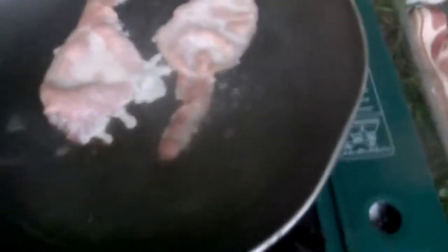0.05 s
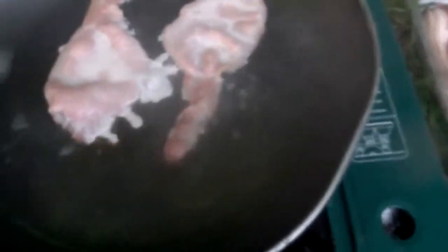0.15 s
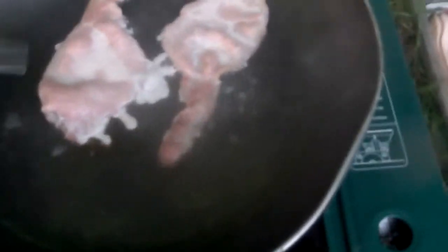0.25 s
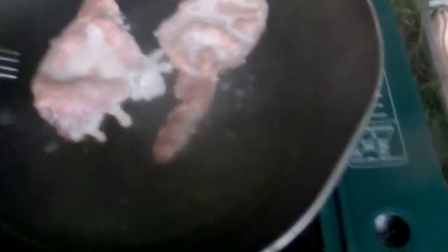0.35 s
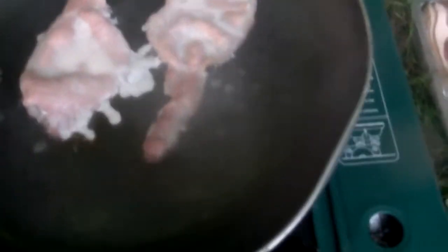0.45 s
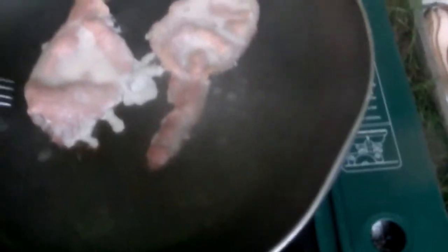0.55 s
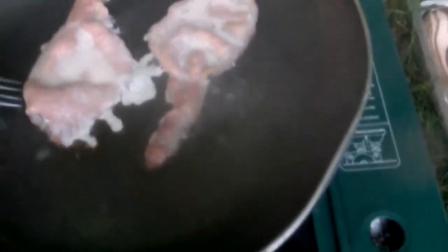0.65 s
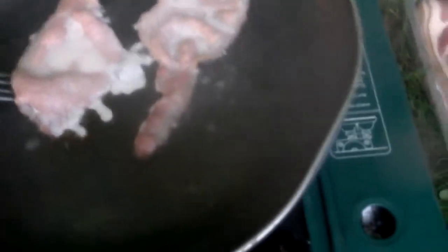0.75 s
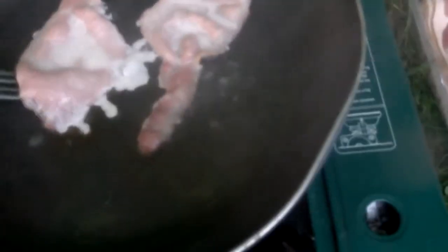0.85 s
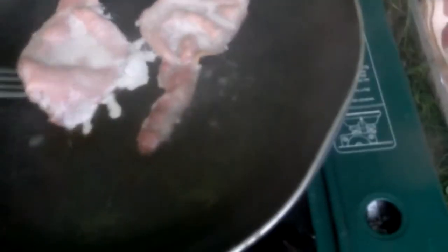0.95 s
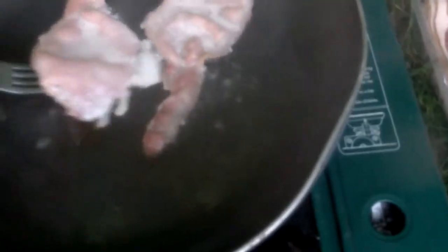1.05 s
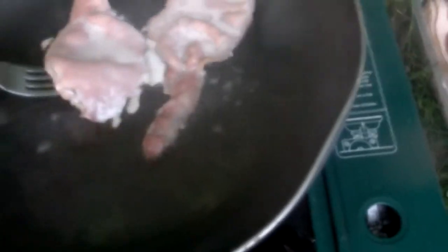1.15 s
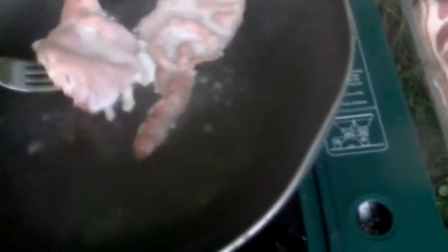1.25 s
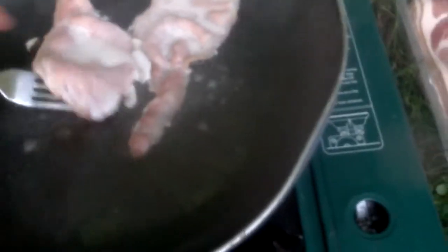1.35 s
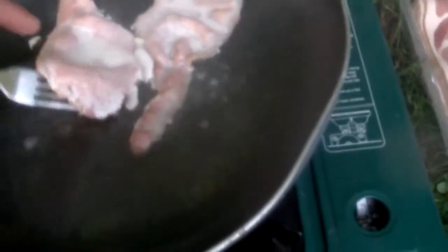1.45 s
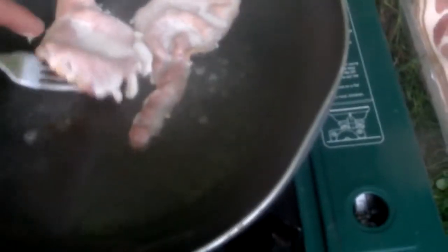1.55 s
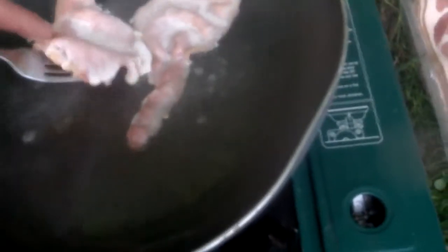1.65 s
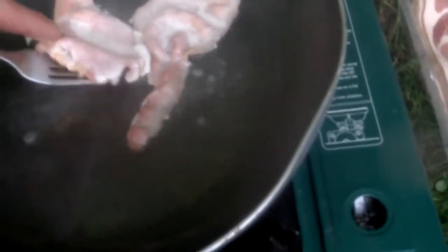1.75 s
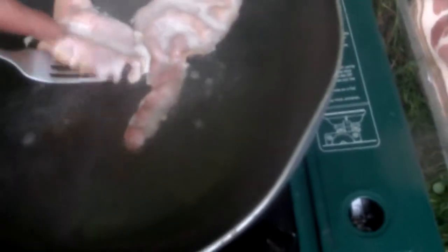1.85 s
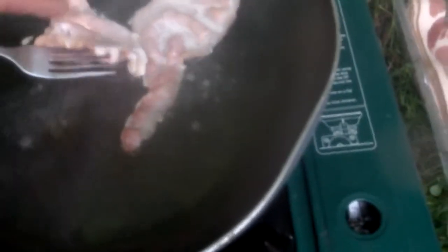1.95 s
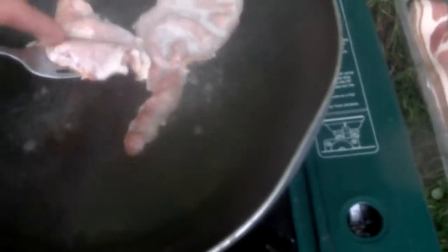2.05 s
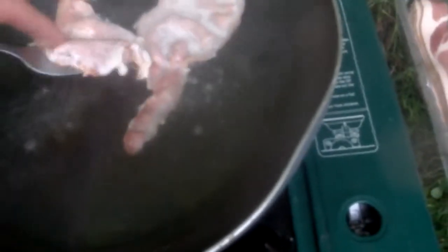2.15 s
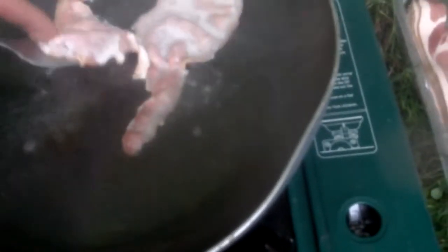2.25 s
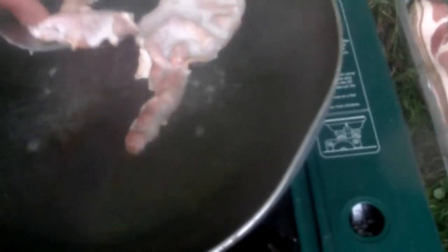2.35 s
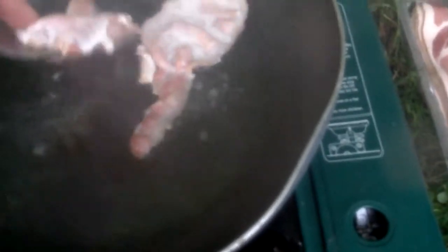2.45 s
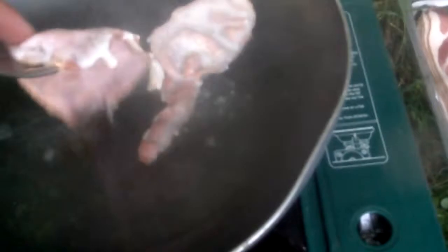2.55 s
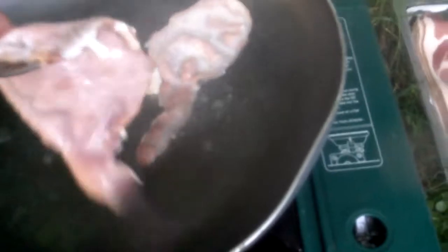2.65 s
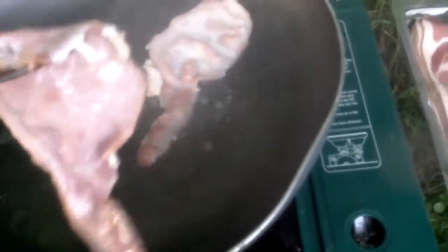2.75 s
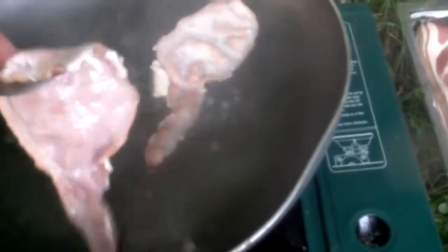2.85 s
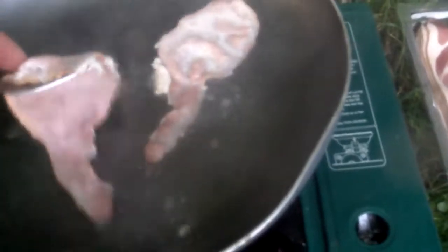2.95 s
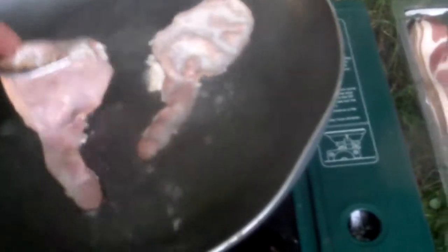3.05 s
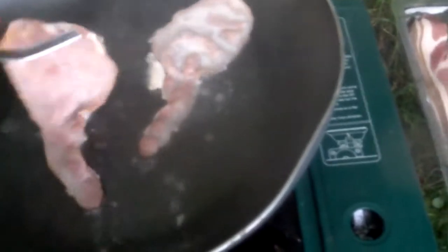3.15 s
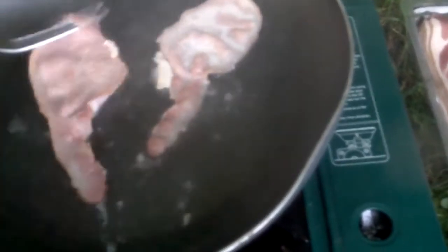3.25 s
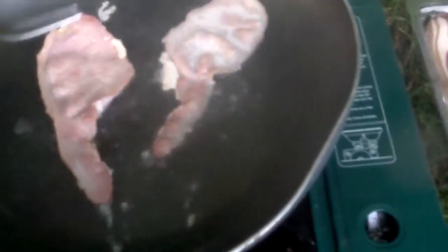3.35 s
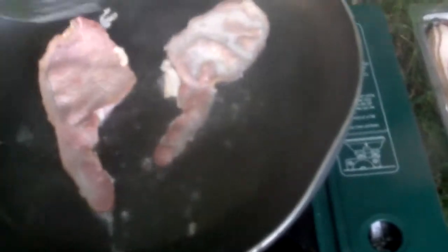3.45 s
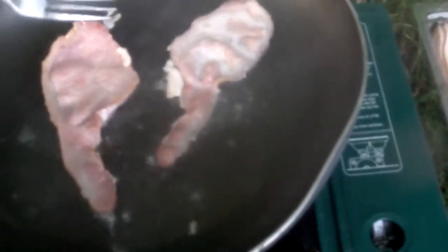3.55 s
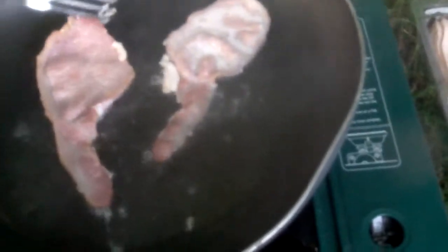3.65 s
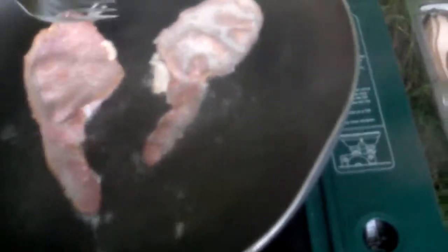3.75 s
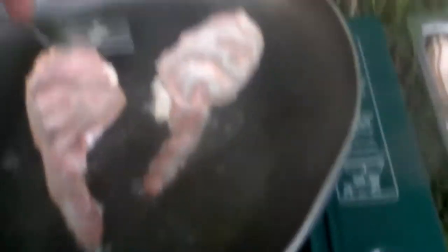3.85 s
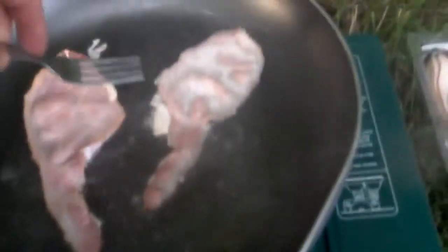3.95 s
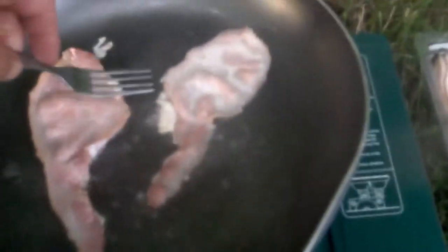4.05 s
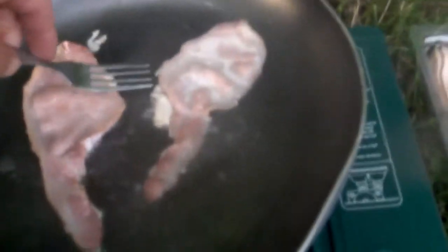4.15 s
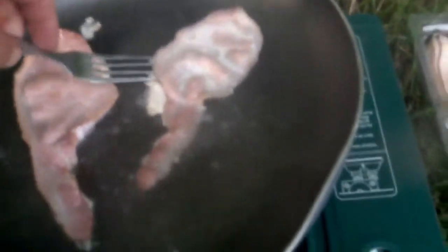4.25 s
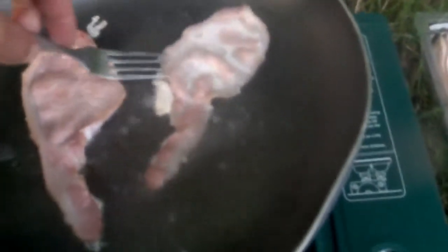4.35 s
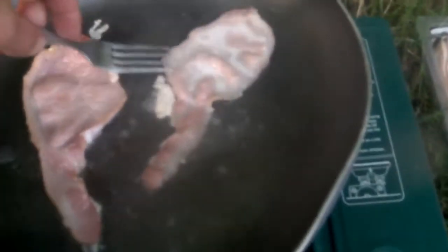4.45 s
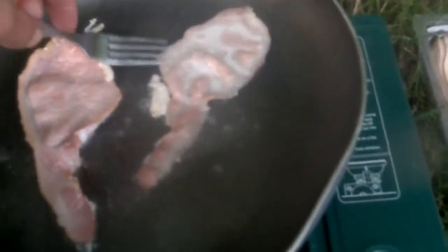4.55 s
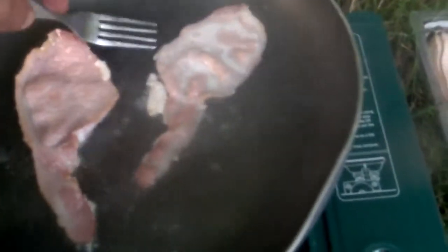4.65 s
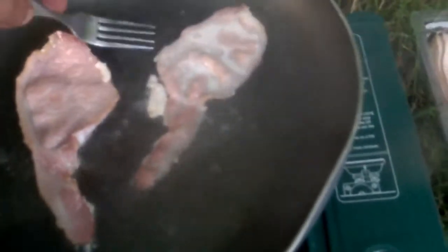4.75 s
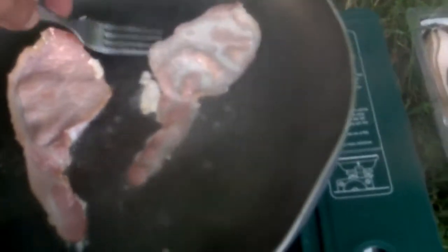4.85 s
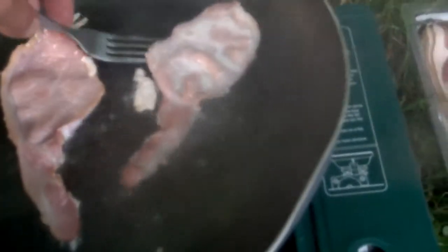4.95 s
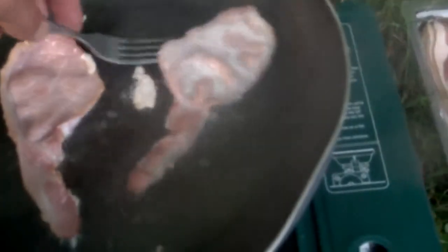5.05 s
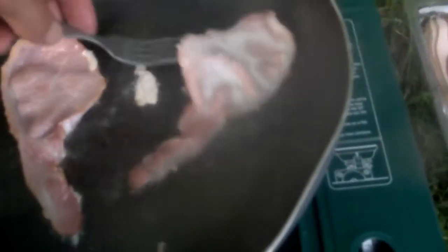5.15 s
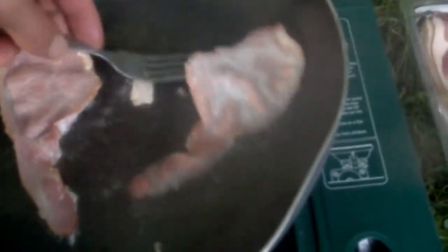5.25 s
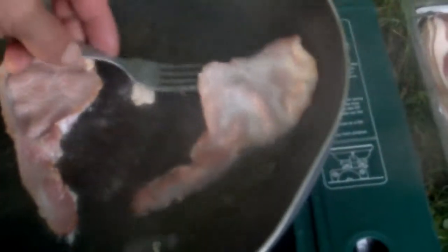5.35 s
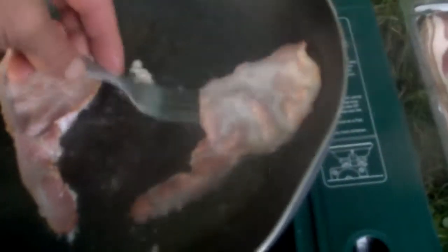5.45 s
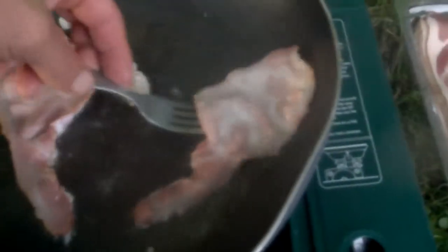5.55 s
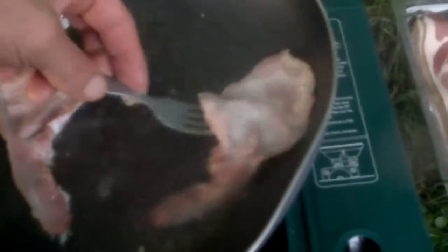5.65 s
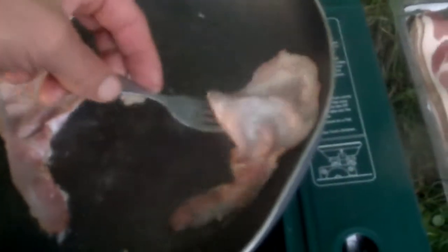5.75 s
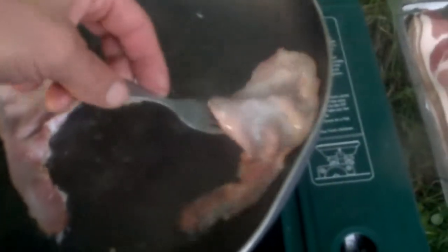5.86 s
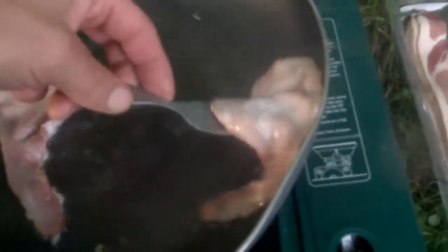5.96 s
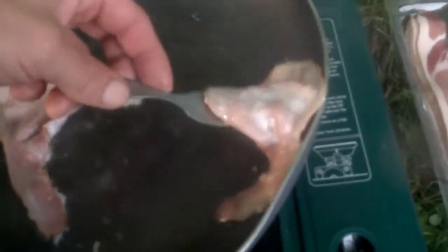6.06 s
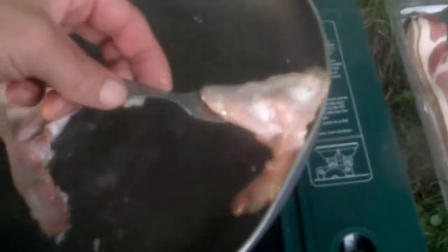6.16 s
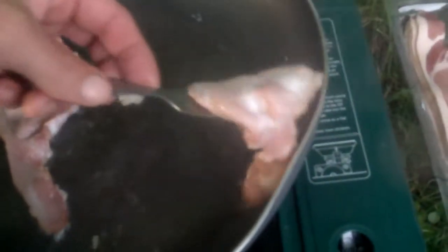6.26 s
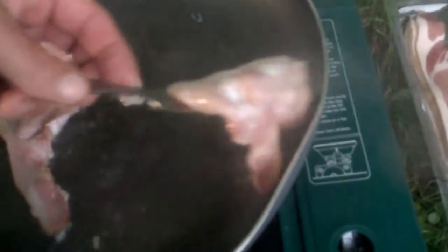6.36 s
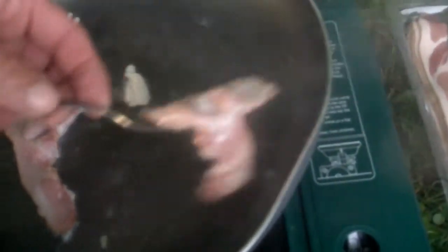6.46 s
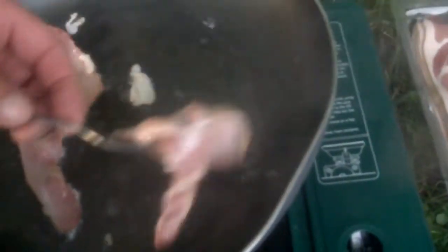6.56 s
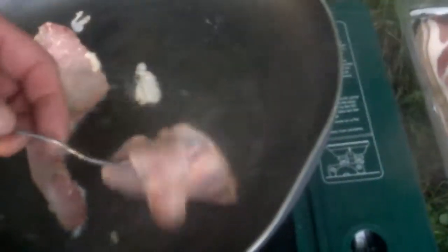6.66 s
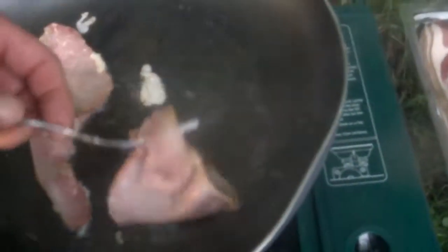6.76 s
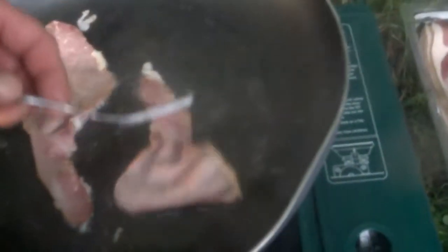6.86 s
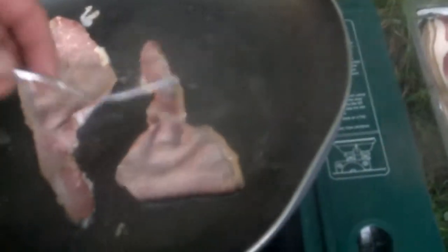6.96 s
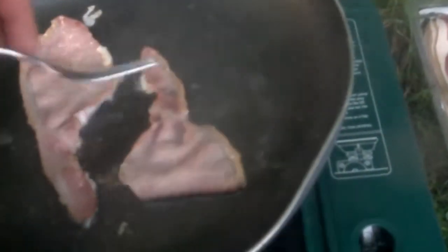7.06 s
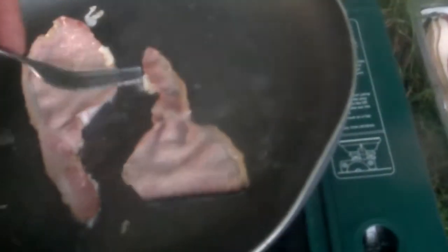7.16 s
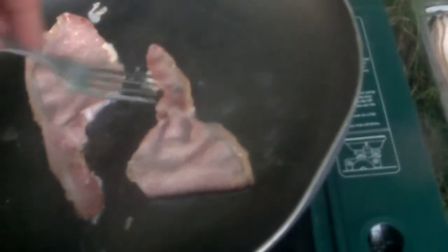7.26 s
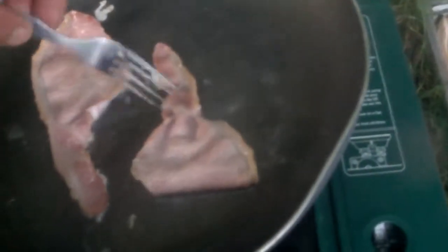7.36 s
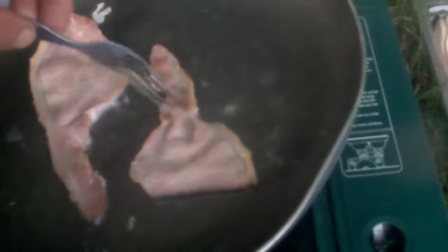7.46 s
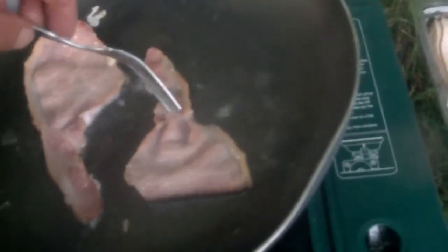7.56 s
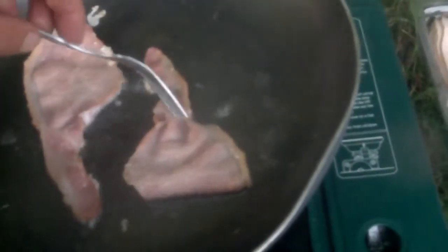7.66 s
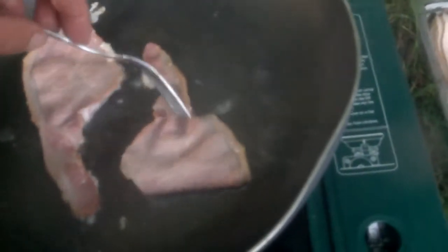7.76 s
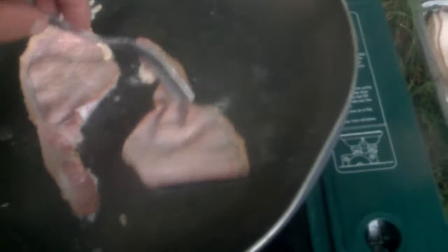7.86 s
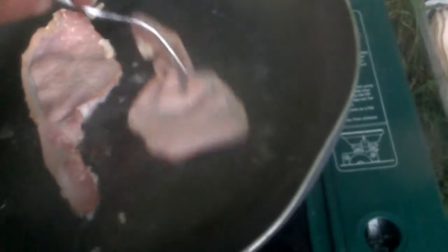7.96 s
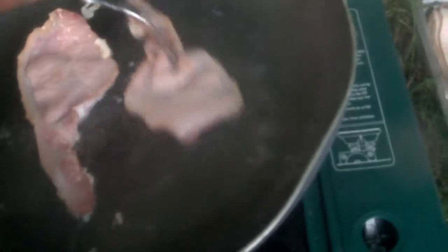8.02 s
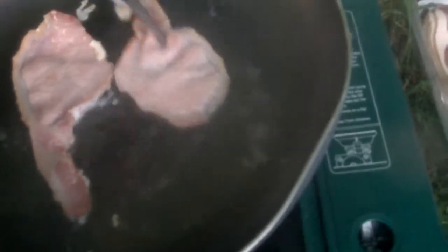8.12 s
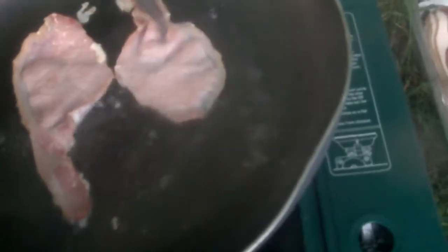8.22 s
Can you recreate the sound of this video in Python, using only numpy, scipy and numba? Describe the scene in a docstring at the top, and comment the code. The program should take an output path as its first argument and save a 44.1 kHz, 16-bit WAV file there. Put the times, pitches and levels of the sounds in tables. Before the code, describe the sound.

A low burner roar lies beneath bright, uneven bacon sizzle. Quiet simmering and scattered ticks come first; after a turned slice touches down, the frying swells into dense crackling with bubbly pops. Light dull knocks ring the pan briefly. A second slice slaps down with a short rumble, then is dragged while sizzling continues. Close, dry, practically mono outdoor sound.

```python
"""Bacon frying outdoors

Bacon fries in a steel pan on a gas camping stove, close under a small microphone that feeds both channels.
Water boils out of the meat in bursts: steam bubbles ring briefly, fat spits in sharp clicks, the pan colours both.
The sizzle jumps when the first slice lands on its raw side. Knocks and small blows ring the pan floor.
The flame is low filtered noise that roars steadily underneath.
A trace of noise, of opposite sign in the two channels, follows the level of the spitting."""
import sys
import numpy as np
from scipy import signal
from scipy.fft import rfft, irfft
from scipy.io import wavfile
from scipy.ndimage import uniform_filter1d
from numba import njit

SR = 44100
rng = np.random.default_rng(int(sys.argv[2]) if len(sys.argv) > 2 else 0)


def dump(signal):
    """Clip the signal to [-1, 1] and save it as 16-bit WAV at the path in sys.argv[1]."""
    limited = np.clip(np.atleast_2d(signal).T, -1, 1)
    pcm = np.round(limited * 32767).astype(np.int16)
    wavfile.write(sys.argv[1], SR, pcm)


def attenuation_scalar(level_db):
    """Turn a level in dB into a linear amplitude multiplier (20 dB per decade)."""
    decades = np.asarray(level_db, float) / 20
    return 10 ** decades


N = 365588  # length in samples


# how pan and microphone colour the sizzle: frequency_hz, gain_db
PAN_COLOUR = [(350, -59), (600, -9.5), (844, -24), (941, -13), (1270, -9), (1580, -32), (2380, -26.5),
              (3210, -18.5), (3680, -8.5), (4450, -6), (5100, -8), (6520, -2), (8220, -10.5),
              (12200, -19.5), (15600, -30.5)]
# narrow resonances and dips of the air between pan wall and microphone: frequency_hz, width_hz, gain_db
PAN_PEAKS = [(2700, 102, 4), (4950, 120, -2.5), (6320, 90, 2.5), (6900, 70, 2.5), (8400, 150, -2.5),
             (9030, 120, 2.5)]
# the resonances shift as the meat covers other parts of the pan: frequency_hz, width_hz, gain_db
DRY_PEAKS = [(7180, 94, 5.5), (9180, 700, -4.5)]  # added before the first slice lands
LATE_PEAKS = [(1760, 150, -4), (2760, 430, 3)]  # added after the second slice flops over


def sizzle(surge_db):
    """Superposition of many random grains: four sizes of bubble and scattered spits, filtered by the pan."""
    t = np.arange(N) / SR
    dry, late = t < LANDING_S, t > FLOP_S
    fits = np.where(dry, 0.7, 1)  # the fits are milder in dB until the wet side lands

    def burst():
        """Modulated event rate: steady simmering plus fits partly in step with the common surge."""
        own_db = 3.2 * walk(4.) + 2.6 * walk(45.) + 2.5 * walk(100.)
        return 1 + attenuation_scalar(fits * (1.2 * surge_db + own_db))

    large = bubbles(burst(), 1700., 3200., 12., 3.2, count=12000)
    middle = bubbles(burst(), 3200., 5400., 22., 3.6, count=20000)
    # small bubbles ring higher until the wet side lands
    small = bubbles(burst(), 5200., 8200., 22., 3.7, count=26000, dry_pitch=1.14)
    tiny = bubbles(burst() ** .5, 8200., 16000., 20., 2.2, count=45000)
    crackle = level(snap(snap(snap(droplets(burst(), 7.0, count=600)))), -3.5)
    ticks = level(droplets(burst(), 4.3, count=2200), -.7)
    # the pan colour is weak below and above its broad hump, so those layers start stronger
    body = stage_gain(3) * (middle + ticks) + boil_gain() * attenuation_scalar(-1.0) * small
    bass = attenuation_scalar(21.5) * stage_gain(2) * large
    treble = attenuation_scalar(16.5) * stage_gain(1) * (crackle + tiny)
    simmer = lulls() * (body + bass + treble)
    spans = ((dry, DRY_PEAKS), (~dry & ~late, []), (late, LATE_PEAKS))
    return sum(colour(span * simmer, PAN_COLOUR, PAN_PEAKS + shifted) for span, shifted in spans)


def bubbles(burst, low_hz, high_hz, cycles, spread_db, count, dry_pitch=1):
    """Free oscillation of steam bubbles: a random size sets the loudness, and decay time follows the period."""
    start, size = swarm(burst, count, spread_db, 16)
    draw = rng.random((count, 2))
    hz = low_hz + (high_hz - low_hz) * draw[:, 0]
    hz = hz * np.where(start < LANDING_S * SR, dry_pitch, 1)
    t60 = cycles * (.5 + draw[:, 1]) / hz
    return level(ring(start, hz, t60, size / np.sqrt(t60), .08, .11, N), 0)


def droplets(burst, spread_db, count):
    """Impulsive excitation: each bursting droplet of fat is a single click of either sign."""
    start, size = swarm(burst, count, spread_db, 18)
    return np.bincount(start, size * rng.choice([-1, 1], count), N)[:N]


def snap(clicks):
    """Differentiation tilts the spectrum: a bursting film of fat is brighter than a plain click."""
    return signal.lfilter([1, -.85], [1], clicks)


# how hard the water boils out of the meat, joined by straight lines: time_s, level_db (relative)
BOIL = [(0.0, -28.5), (0.7, -28.5), (1.0, -26), (1.55, -25.5), (2.1, -25), (2.75, -25.5), (2.965, -22),
        (2.995, -21.5), (3.3, -19.5), (3.9, -21.5), (4.02, -18), (4.15, -20.5), (5.0, -18), (5.6, -21),
        (6.0, -19), (6.4, -21), (7.05, -19.5), (8.29, -20)]


def boil_gain():
    """Amplitude envelope of the boiling, sample by sample."""
    return attenuation_scalar(np.interp(np.arange(N) / SR, *np.transpose(BOIL)))


# each handling of the meat shifts the mix; levels are relative to the boil:
# start_s, spitting_db, large_bubbles_db, middle_bubbles_db
# in turn: both slices lie still; the fork lifts the first slice and bare fat spits; it hangs in the air;
# it lands on its wet side; juice pools under it; the juice has spread; the second flops over; it is dragged aside
STAGES = [(0.0, -10, -22.5, -3), (1.1, -9, -24.5, -4.5), (2.45, -11, -27, -5.5), (2.97, -11, -24, -1),
          (3.42, -12.5, -23, 0.5), (4.1, -12, -24, -2), (6.75, -13.5, -21.5, -2), (8.0, -13.5, -26, -2)]
LANDING_S, FLOP_S = STAGES[3][0], STAGES[6][0]


def stage_gain(column):
    """Spectral balance by stage: gain of the spitting (1), large (2) or middle bubbles (3) over the boil."""
    rows = np.array(STAGES)
    held_db = rows[np.searchsorted(rows[1:, 0], np.arange(N) / SR), column]
    return boil_gain() * attenuation_scalar(uniform_filter1d(held_db, int(0.063 * SR)))  # the mix takes 63 ms to change


# each burst, spit and snap sounds this long after its listed time
ONSET_DELAY_S = 0.001
# loudest bubble bursts: start_s (1 ms before the sound), level_db (relative), pitch_hz (at the onset)
POPS = [(0.595, -18, 4860), (0.7494, -15, 7050), (0.9882, -13, 7220), (1.3014, -14, 6190),
        (1.4094, -18, 4600), (1.5564, -13, 6220), (1.6013, -14, 6950), (1.6796, -13, 7220),
        (1.8654, -16, 4400), (2.0153, -15, 7000), (2.4319, -18, 4260), (2.4678, -16, 6770),
        (2.5212, -14, 7330), (2.6758, -18, 3900), (2.9926, -8, 6350), (3.044, -9, 5740), (3.1807, -5, 6020),
        (3.3273, -9, 4290), (3.6102, -6, 6340), (4.0198, -3, 4590), (4.0846, -7, 6810), (4.2043, -6, 6010),
        (4.5855, -11, 6320), (4.6214, -5, 6760), (4.6553, -4, 6890), (4.7237, -4, 6730),
        (5.3009, -11, 6680), (5.4296, -8, 6490), (5.5134, -8, 4500), (5.5643, -7, 6360), (5.8815, -9, 4490),
        (6.0152, -3, 4950), (6.0526, -6, 6290), (6.3794, -8, 6940), (6.5274, -5, 7070), (6.5755, -7, 6840),
        (6.6528, -5, 5810), (6.8613, -4, 5160), (6.9536, -6, 4410), (6.99, -7, 4190), (7.0504, -7, 5580),
        (7.1038, -6, 6110), (7.4114, -8, 4270), (7.5692, -9, 4350), (7.7994, -7, 6460), (8.0875, -8, 6040)]
# loudest sharp spits: start_s (1 ms before the sound), level_db (of the treble, relative)
SPITS = [(0.0847, -20), (0.1999, -19), (0.818, -20), (1.1029, -20), (2.0457, -19), (2.152, -14),
         (2.3481, -20), (2.9397, -15), (3.2176, -14), (3.3473, -13), (3.3554, -10), (3.6262, -15),
         (3.7494, -18), (3.9823, -14), (3.9954, -14), (4.0886, -15), (4.2961, -15), (4.3254, -15),
         (4.366, -16), (4.3894, -13), (4.7461, -18), (4.8274, -16), (5.225, -14), (5.6361, -13),
         (5.8775, -16), (6.0317, -17), (6.0405, -15), (6.1514, -19), (6.3864, -13), (6.6792, -18),
         (7.1696, -13), (7.5398, -17), (7.7468, -16), (8.2357, -17)]


def loud_pops():
    """Transient radiation: bursts ring as bubbles amid a spray of droplets, and lone spits click sharply."""
    s, db, hz = np.transpose(POPS)
    cycles, swell = 26., .05  # cycles to fall 60 dB; share of the life spent swelling
    u = np.linspace(0, 1, 500)
    shape = (1 - np.exp(-u / swell)) ** 2 * 1000. ** -u
    start = ((s + ONSET_DELAY_S) * SR).astype(int)
    pops = ring(start, hz, cycles / hz, .88 * attenuation_scalar(db) / shape.max(), 0.033, swell, N)

    # the spray is noise that rises and fades around each burst
    fade = np.exp(-np.abs(np.arange(-600, 600)) / (0.0032 * SR))
    swells = np.convolve(np.bincount(start, attenuation_scalar(db), N), fade, "same")
    spray = colour(attenuation_scalar(-2.5) * swells * rng.standard_normal(N), PAN_COLOUR, PAN_PEAKS)

    s, db = np.transpose(SPITS)
    spit = colour(snap(snap(snap(np.arange(2048) == 0))), PAN_COLOUR, PAN_PEAKS)[:2048]
    highpass = signal.butter(4, 9500, "highpass", fs=SR, output="sos")
    treble = signal.sosfilt(highpass, spit)
    clicks = np.bincount(((s + ONSET_DELAY_S) * SR).astype(int), attenuation_scalar(db + 4.5), N)
    lone_spits = signal.fftconvolve(clicks, spit / np.abs(treble).max())[:N]
    return pops + spray + lone_spits


def lulls():
    """Gating before release: the simmer dips by 2.5 dB while steam gathers for each loud burst."""
    start = (np.transpose(POPS)[0] * SR).astype(int)
    half = int(0.006 * SR)  # half the length of a dip
    dip = np.convolve(np.bincount(start, minlength=N), np.hanning(2 * half))[2 * half:]
    return attenuation_scalar(-2.5 * np.pad(dip, (0, N))[:N])


# dry snaps of large pockets of fat that reach down into the mids:
# start_s (1 ms before the sound), level_db (peak of the mids)
SNAPS = [(1.7464, -28), (2.5696, -27), (3.488, -26), (3.5693, -26), (4.0881, -24), (4.347, -27),
         (4.3894, -25), (6.0462, -24), (6.7002, -27), (6.9341, -26), (7.0384, -25), (7.1731, -25),
         (7.5692, -25), (7.6101, -24), (7.6999, -24)]


def snaps():
    """Band-limited impulsive noise: short cracks that fall 60 dB in 6 ms."""
    s, db = np.transpose(SNAPS)
    fade = 1000. ** (-np.arange(512) / SR / 0.006)
    band = signal.butter(1, (1200, 4800), "bandpass", fs=SR, output="sos")
    cracks = signal.sosfilt(band, rng.standard_normal((len(s), 512)) * fade)
    mids = signal.butter(2, [1500, 3300], "bandpass", fs=SR, output="sos")
    out = np.zeros(N + 512)
    for start, gain, crack in zip(((s + ONSET_DELAY_S) * SR).astype(int), attenuation_scalar(db), cracks):
        out[start:start + len(crack)] += gain * crack / np.abs(signal.sosfilt(mids, crack)).max()
    return out[:N]


# dull knocks that ring the pan floor: start_s, level_db (relative)
KNOCKS = [(0.517, -22.5), (2.948, -26), (4.45, -23), (5.156, -23), (5.565, -21.5), (6.234, -22),
          (6.387, -26), (6.855, -28), (7.575, -26.5), (7.701, -23)]
# pan floor modes: frequency_hz, level_db (relative), t60_s
PAN_MODES = [(872, 0.5, 0.015), (1046, -3.5, 0.022), (1289, 2.5, 0.025)]


def pan_floor(surge_db):
    """Modal response: knocks and a patter that grows with the boiling ring the low modes; the patter also ticks."""
    s, db = np.transpose(KNOCKS)
    blows = np.bincount((s * SR).astype(int), attenuation_scalar(db), N)
    crowding = 1 + attenuation_scalar(3.0 * surge_db + 2.5 * walk(50.))
    patter = level(droplets(crowding, 7.0, count=4500), -51.5)
    patter = patter * (boil_gain() / attenuation_scalar(-14.5)) ** 1.48
    t = np.arange(SR // 8) / SR
    modes = sum(attenuation_scalar(g) * np.sin(2 * np.pi * f * t) * 1000. ** (-t / t60) for f, g, t60 in PAN_MODES)
    # wet meat lands softly, so the modes take a moment to build
    rung = signal.fftconvolve(blows + patter, modes * (1 - np.exp(-t / 0.00097)) ** 2)[:N]
    tick = signal.butter(2, (1200, 4800), "bandpass", fs=SR, output="sos")
    return rung + attenuation_scalar(11.0) * signal.sosfilt(tick, patter)


# the flopping slice slaps the pan once: crest_s, level_db (peak), pitch_hz, width_s
SLAP = (6.7265, -13, 280, 0.0025)


def slap():
    """Impact pulse: one low swing of air and pan under a Gaussian envelope."""
    s, db, hz, width = SLAP
    t = np.arange(N) / SR - s
    return attenuation_scalar(db) * np.cos(2 * np.pi * hz * t) * np.exp(-(t / width) ** 2)


# low rumbling puffs as a slice flops over and is dragged:
# crest_s, level_db (rms at the crest), low_hz, high_hz, rise_s, fall_s
PUFFS = [(6.718, -27.5, 125, 490, 0.028, 0.085), (8.022, -35.5, 360, 540, 0.052, 0.045)]


def puffs():
    """Amplitude-modulated band noise: short lumpy swells of low rumble."""
    t, out = np.arange(N) / SR, 0
    for s, db, low_hz, high_hz, rise, fall in PUFFS:
        band = signal.butter(6, [low_hz, high_hz], "bandpass", fs=SR, output="sos")
        shape = np.exp(-np.abs(np.where(t < s, (t - s) / rise, (t - s) / fall)) ** 2.2)
        puff = shape * signal.sosfilt(band, rng.standard_normal(N))
        out = out + attenuation_scalar(db) * puff * np.sqrt(np.sum(shape ** 2) / np.sum(puff ** 2))
    return out


# spectrum of the flame roar: frequency_hz, level_db (relative)
FLAME = [(12, -33), (20, 2), (43, -0.5), (118, -0.5), (286, 1), (383, -4), (460, -3.5), (584, -16.5),
         (890, -9.5), (1090, -12), (1280, -10), (1600, -23.5), (2080, -21.5), (3520, -120)]


def flame():
    """Turbulent combustion noise: low random pressure that flutters slightly, -40 dB rms."""
    flutter = attenuation_scalar(0.72 * walk(12.))
    return level(colour(rng.standard_normal(N) * flutter, FLAME), -40)


# spectrum of the faint noise of opposite sign in the two channels: frequency_hz, level_db (relative)
SIDE_COLOUR = [(18, -32), (30, -7), (731, -3.5), (1300, -6), (1830, -8), (3330, -10.5), (3900, -7.5),
               (4810, -29), (15600, -2.5)]


def side_noise():
    """Amplitude modulation of filtered noise: a faint trace, -51 dB rms, that follows the spitting level."""
    return level(colour(rng.standard_normal(N), SIDE_COLOUR) * stage_gain(1) ** 1.3, -51)


def level(x, db):
    """Root-mean-square normalisation to a level in dB."""
    return x * attenuation_scalar(db) / np.sqrt(np.mean(x ** 2))


def colour(x, points, peaks=()):
    """Minimum-phase filtering through (Hz, dB) points and peaks, made causal by folding the cepstrum."""
    hz, db = np.transpose(points)
    size = 8192
    grid = np.maximum(np.arange(size // 2 + 1) * SR / size, 1)
    shape_db = np.interp(np.log(grid), np.log(hz), db)
    shape_db += sum(g * np.exp(-((grid - f) / width) ** 2) for f, width, g in peaks)
    cep = irfft(np.log(attenuation_scalar(shape_db)))
    cep[1:size // 2] *= 2
    cep[size // 2 + 1:] = 0
    return signal.fftconvolve(x, irfft(np.exp(rfft(cep))))[:N]


@njit
def ring(start, hz, t60, size, glide, swell, n):
    """Damped oscillation: each sine swells over a share of its life, dies away and climbs in pitch."""
    out = np.zeros(n)
    for k in range(len(start)):
        length = int(t60[k] * SR) + 2
        phasor, gap = size[k] + 0j, 1.
        step = np.exp(2j * np.pi * hz[k] / SR - np.log(1000) / length)
        climb = np.exp(2j * np.pi * hz[k] * glide / SR / length)
        close = np.exp(-1 / (swell * length))
        for i in range(start[k], min(start[k] + length, n)):
            out[i] += phasor.imag * (1 - gap) ** 2
            gap *= close
            phasor *= step
            step *= climb
    return out


def walk(rate):
    """Band-limited random process: levels held 1 / rate s, smoothed twice, without slow drift; spread 1."""
    k = max(int(SR / rate), 2)
    held = np.repeat(rng.standard_normal(N + 1)[:N // k + 1], k)
    w = uniform_filter1d(uniform_filter1d(held, k), k)[:N]
    w = w - uniform_filter1d(w, 5 * k)
    return w / w.std()


def swarm(burst, count, spread_db, most_db):
    """Inhomogeneous point process: starts crowd where bursts are strong; a few grains are larger, up to a limit."""
    draw = rng.random((count, 2))
    share = np.cumsum(burst)
    start = np.searchsorted(share, draw[:, 0] * share[-1])
    size_db = -spread_db * np.log(1 - draw[:, 1])
    return start, attenuation_scalar(np.minimum(size_db, most_db))


def scene():
    """Superposition at one microphone that feeds both channels, plus the faint noise of opposite sign."""
    surge_db = 0.9 * walk(12.) + 1.2 * walk(40.) + 1.3 * walk(80.)
    frying = sizzle(surge_db) + loud_pops() + snaps() + pan_floor(surge_db)
    mid = frying + flame() + puffs() + slap()
    side = side_noise()
    return np.array([mid + side, mid - side])


def band_limit(x):
    """A steep low-pass at the top of the band."""
    return signal.sosfilt(signal.butter(12, 15760, fs=SR, output="sos"), x)


def record(dry):
    """Soft saturation rounds the tallest peaks; a steep low-pass at 15780 Hz cuts the top."""
    rounded = 1.105 * np.tanh(dry / 1.106)
    cut = signal.ellip(8, .2, 70, 15780, fs=SR, output="sos")
    finished = signal.sosfilt(cut, rounded)
    return band_limit(finished)


dry = scene()
out = record(dry)
dump(out)
```